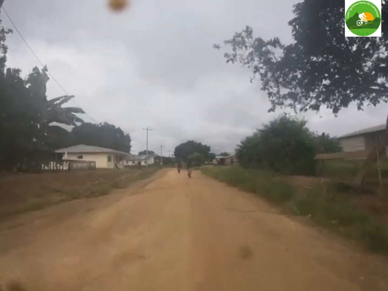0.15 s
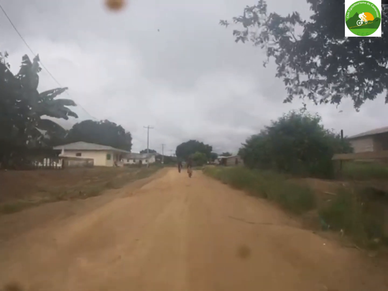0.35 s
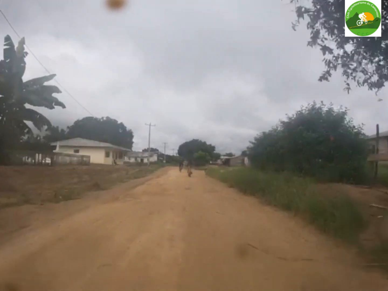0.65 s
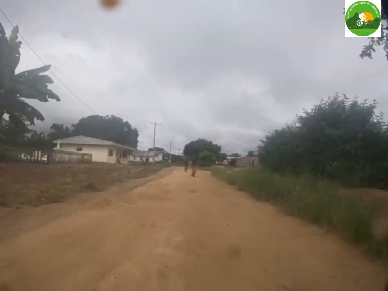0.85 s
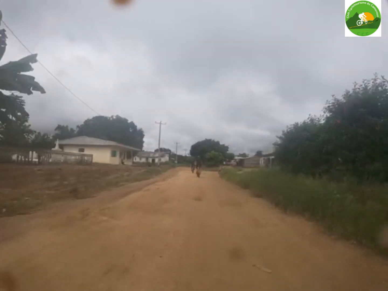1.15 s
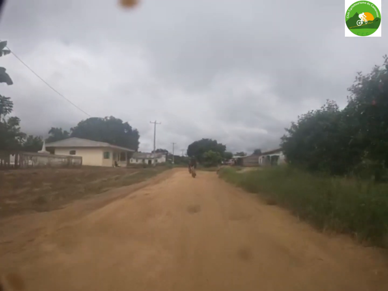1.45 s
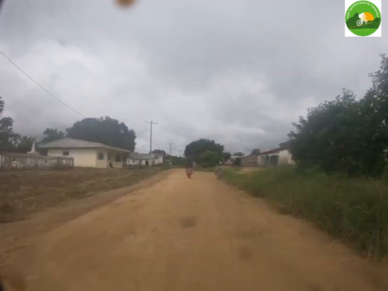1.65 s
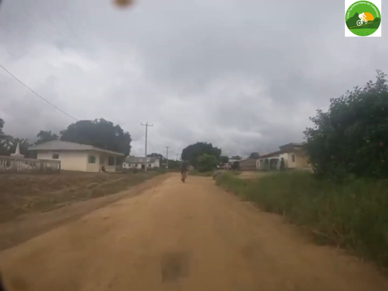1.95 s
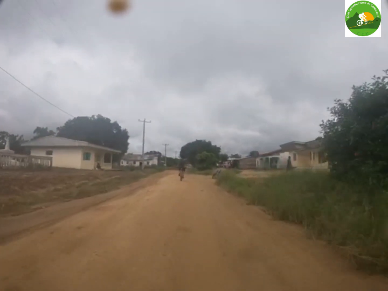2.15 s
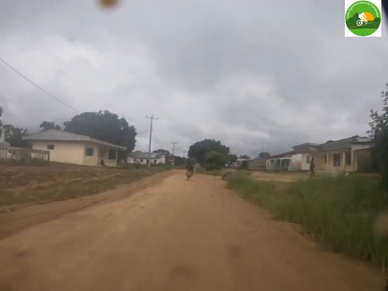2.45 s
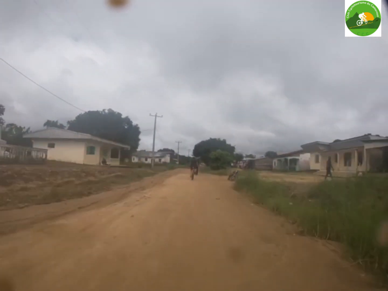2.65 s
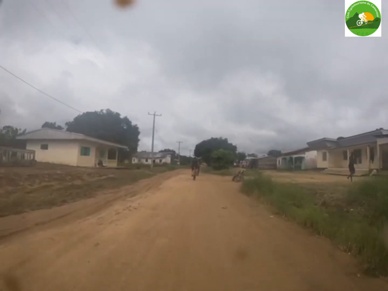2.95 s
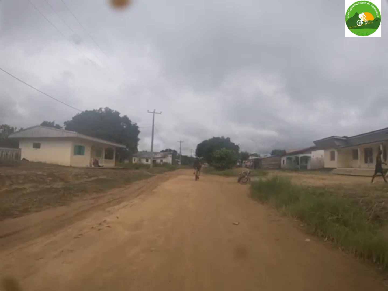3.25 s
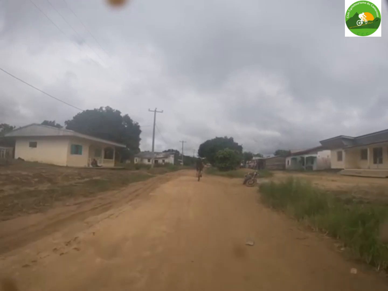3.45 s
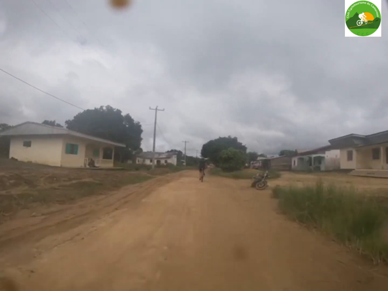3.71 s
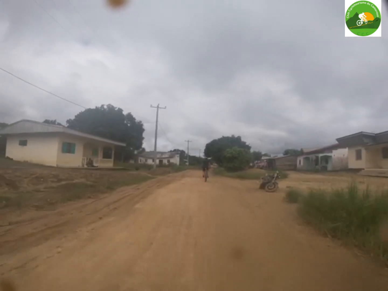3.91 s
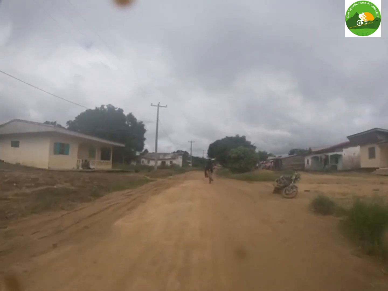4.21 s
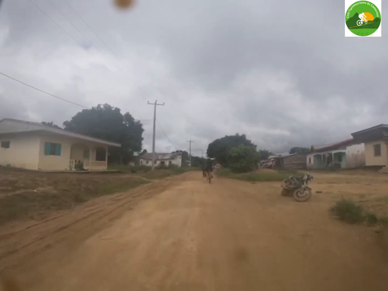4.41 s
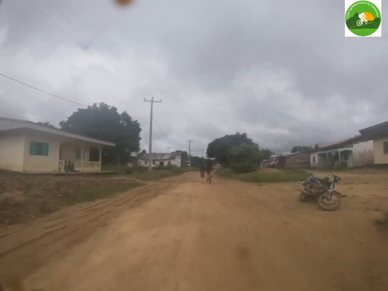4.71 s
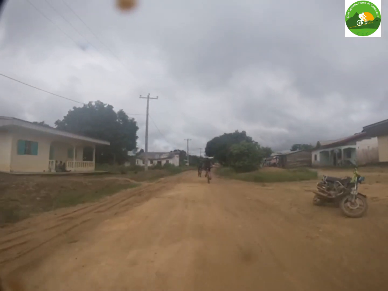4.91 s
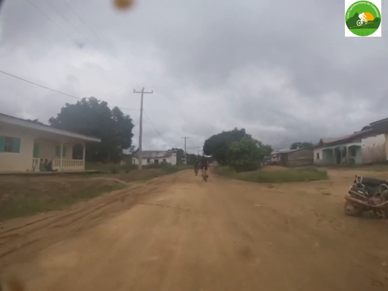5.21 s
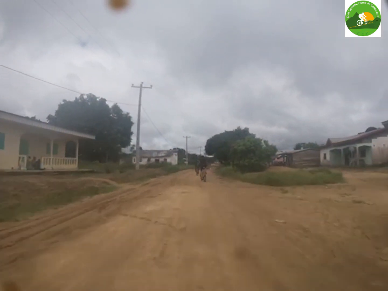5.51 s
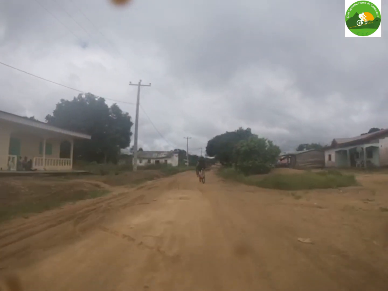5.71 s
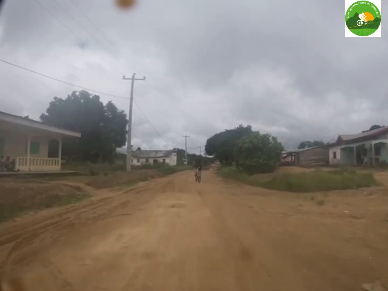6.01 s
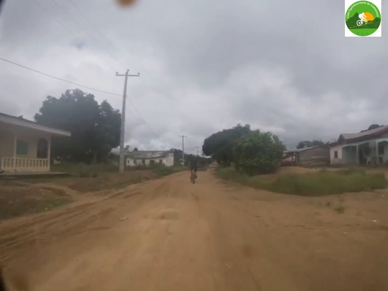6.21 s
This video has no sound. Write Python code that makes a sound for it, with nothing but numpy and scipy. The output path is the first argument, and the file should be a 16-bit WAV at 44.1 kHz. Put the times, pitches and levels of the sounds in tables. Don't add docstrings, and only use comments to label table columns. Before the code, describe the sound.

A bicycle rolls along a rough dirt road outdoors, heard from inside a sealed case on its handlebar. Rapid uneven knocks clack and thump for two seconds, the hardest with a tiny metallic chatter near 1.5 seconds. Then the knocks become isolated, boxier and shortly ringing, over faint muffled tyre hiss, low mount trembling and wind rumble. A last cluster comes near six seconds.

```python
import sys
import numpy as np
from scipy import signal
from scipy.fft import rfft, irfft
from scipy.io import wavfile
from scipy.ndimage import uniform_filter1d

SR = 44100
rng = np.random.default_rng(int(sys.argv[2]) if len(sys.argv) > 2 else 0)


def store_pcm(level_fs):
    pcm = np.round(np.clip(level_fs, -1, 1) * 32767).astype(np.int16)
    wavfile.write(sys.argv[1], SR, np.atleast_2d(pcm).T)


def field_ratio(decibels):
    return 10 ** (np.asarray(decibels, dtype=float) / 20)


N = 280639
MS = np.arange(-8192, 8192) / SR * 1000

# start_s, roughness_db, wind_db
RIDE = [(0.0, -63, -69), (0.44, -57, -70.5), (0.58, -67.5, -67.5), (0.83, -68.5, -72.5),
        (1.19, -63.5, -72.5), (1.57, -63, -72), (2.02, -67, -74), (2.27, -65.5, -75.5), (2.83, -56, -68.5),
        (2.97, -61.5, -71.5), (3.56, -60, -66.5), (4.16, -60.5, -71), (4.64, -57.5, -67.5),
        (4.96, -61.5, -66.5), (5.35, -58.5, -61.5), (5.61, -58, -61), (5.85, -58, -65.5),
        (6.36, -66.5, -69)]
# frequency_hz, density_db
TYRE_SPECTRUM = [(300, -30.5), (700, -5), (1100, 1), (1600, 2), (2300, -1), (3500, -4), (4300, -11),
                 (5000, -16.5), (6000, -23.5), (7000, -37), (9000, -56)]
TREMBLE_SPECTRUM = [(80, -49), (115, -24), (135, 1.5), (160, 2.5), (200, -1), (235, -2), (270, -46.5),
                    (400, -61.5)]
RUMBLE_SPECTRUM = [(8, 1.5), (20, 1.5), (50, 1.5), (90, -8), (120, -10), (200, -47), (400, -61.5)]
GUST_SPECTRUM = [(150, -23), (300, 2.5), (450, -4), (600, -3.5), (800, -9.5), (1300, -14.5), (2500, -38),
                 (5000, -62.5)]
SEAL_AIR_SPECTRUM = [(4500, -14), (6000, 5), (9000, 5), (11000, 2), (12500, -30.5)]
# frequency_hz, level_db
SHELL_SPECTRUM = [(150, 9.5), (600, 6), (1000, -0.5), (1600, 1), (2500, -6), (3200, -8), (4000, -15.5),
                  (5000, -25.5), (6300, -40), (8000, -63)]
# frequency_hz, width_hz, level_db
FRAME_MODES = [(1590, 22, -73), (1040, 84, -79)]
# start_s, tick_db, thump_db, swing_db
WASHBOARD = [(0.3432, -10, -21.5, -15), (0.4316, -13.5, -24.5, -23), (0.5598, -14, -22, -21.5),
             (0.785, -16.5, -24.5, -25), (0.992, -12, -21, -18.5), (1.0844, -17.5, -25, -25.5),
             (1.2163, -16, -22.5, -24), (1.34, -14.5, -25, -24.5), (1.4371, -15, -21.5, -22),
             (1.474, 3, -10.5, -9), (1.5437, -22, -26, -31), (1.6429, -17.5, -24.5, -24),
             (1.7113, -24, -28.5, -31), (1.827, -21.5, -26, -26.1), (1.963, -18.5, -23.5, -28),
             (1.9972, -27, -31.5, -31.5)]
# start_s, tick_db, thump_db, swing_db, ring_db
RUTS = [(2.3377, -16, -27.5, -19, -26), (2.666, -16.5, -27, -21, -28), (2.9593, -16, -25.7, -18, -21),
        (3.5234, -15, -22.5, -17, -25.5), (3.8216, -15.5, -21.5, -19, -24),
        (4.1515, -14.5, -23.5, -17, -22), (4.6293, -13, -24.5, -15.5, -35.5), (5.708, -13, -25.5, -15, -34),
        (5.7893, -16, -24.5, -18, -25.5), (6.0114, -14, -21.2, -16, -22), (6.051, -14.5, -23, -16.5, -27.5),
        (6.0993, -21, -29, -26, -44), (6.3105, -17, -22, -18, -24.5)]
# start_s, tick_db, direction_sign
REBOUNDS = [(0.375, -36, -1), (0.39, -36, -1), (1.4443, -29, -1), (1.4595, -35, -1), (1.477, -35.5, -1),
            (1.483, -36, -1), (1.5402, -30, -1), (1.5493, -35, -1), (1.5553, -38.5, -1), (1.668, -47, -1),
            (2.877, -37, -1), (2.88, -37.5, -1), (3.54, -22, -1), (4.6378, -23, -1),
            (.5991, -18, -1),
    (.5998, -18, 1),
    (.60008, -17, 1),
    (.60028, -18, -1),
]
# start_s, thump_db, direction_sign
SOFT_JOLTS = [(0.354, -31, 1), (0.3804, -43, 1), (0.603, -22, -1), (1.0945, -32, -1), (1.462, -21.5, -1),
              (1.4719, -25.5, -1), (2.0185, -37, -1), (2.885, -36, -1), (2.8902, -29, -1), (3.545, -44, 1),
              (3.5488, -26, -1), (3.8308, -26, -1), (4.158, -29, -1), (4.6415, -44, 1), (4.6625, -26, 1),
              (4.6645, -24, -1), (5.698, -31, -1), (5.7387, -24.5, -1), (5.8307, -33, -1),
              (6.1247, -28, -1), (6.3182, -26, -1), (6.3342, -29, -1)]
# start_s, level_db
TOUCHES = [
    (1.449, -61.5),
    (1.459, -52),
    (1.462, -50.5),
    (1.467, -49),
    (1.469, -50),
    (1.478, -55),
    (1.485, -51),
    (1.489, -54),
    (1.494, -56),
    (1.499, -61.5),
]
# pitch_hz, level_db, t60_ms
PART_MODES = [(1620, -7.5, 18), (4100, -3, 34), (4770, -11.5, 45), (5280, -14.5, 60)]
# start_s, level_db, pitch_hz, length_ms
SHIVERS = [
    (2.715, -44, 169, 8.4),
    (2.756, -44.5, 200, 9.7),
    (2.825, -41, 182, 7.9),
    (2.872, -38.5, 169, 7.7),
    (3.535, -33, 151, 3.1),
    (3.5398, -26, 189, 3),
    (4.617, -39.5, 166, 4.8),
    (4.647, -36.5, 172.8, 4.8),
    (5.722, -36, 205, 8),
    (5.805, -41, 194.4, 9),
]


def strikes(times, gains, shape):
    train = np.zeros(N)
    np.add.at(train, np.round(np.asarray(times) * SR).astype(int), gains)
    return signal.fftconvolve(train, shape)[len(shape) // 2:][:N]


def colour(table, size):
    hz, db = np.transpose(table)
    bins = np.maximum(np.fft.rfftfreq(size, 1 / SR), 1)
    return field_ratio(np.interp(np.log(bins), np.log(hz), db)) * (bins < hz[-1])


def noise(table):
    white = rfft(rng.standard_normal(N + 1))
    x = irfft(white * colour(table, N + 1), N + 1)[:N]
    return x / x.std()


def click(table):
    pulse = np.fft.fftshift(irfft(colour(table, len(MS))))
    return pulse / pulse.max()


def walk(rate_hz):
    k = int(SR / rate_hz)
    held = np.repeat(rng.standard_normal(N // k + 1), k)
    return 1.8 * uniform_filter1d(uniform_filter1d(held, k), k)[:N]


def ring(hz, t60_ms, late_ms=0):
    age = np.maximum(MS - late_ms, 0)
    return np.sin(2 * np.pi * hz * age / 1000) * np.exp(-np.log(1000) * age / t60_ms)


def loose(s):
    return .5 + .5 * np.tanh((s - 3.05) / .25)


def jolts():
    usual_swing_db, usual_ring_db, ring_per_swing = -18.5, -29, 1.48
    quick = [(*row, usual_ring_db + ring_per_swing * (row[-1] - usual_swing_db)) for row in WASHBOARD]
    return np.transpose(quick + RUTS)


def tyres(db):
    out = noise(TYRE_SPECTRUM) * field_ratio(db + 0.6 * walk(25))
    for hz, width_hz, peak_db in FRAME_MODES:
        resonator = signal.iirpeak(hz, hz / width_hz, SR)
        mode = signal.lfilter(*resonator, rng.standard_normal(N))
        out = out + mode * field_ratio(peak_db + 19 + 1.7 * walk(4.6))
    return out


def grit(db, count=400):
    when, size = rng.random((count, 2)).T
    at = when * (N - 1) / SR
    grain_db = db[(at * SR).astype(int)] + 7 + 6 * size
    return strikes(at, field_ratio(grain_db), click(TYRE_SPECTRUM))


def mount(db):
    s, _, _, swing_db, _ = jolts()
    swell = np.exp(-np.abs(MS - 8) / np.where(MS > 8, 14, 9))
    aftermath = strikes(s, field_ratio(swing_db - 27), swell)
    return noise(TREMBLE_SPECTRUM) * (field_ratio(db + 1.6 * walk(22)) + aftermath)


def wind(rumble_db, gust_db, seal_db):
    rumble = noise(RUMBLE_SPECTRUM) * (field_ratio(rumble_db + 1.1 * walk(8)) + sway())
    gust = noise(GUST_SPECTRUM) * field_ratio(gust_db + 1.3 * walk(30))
    seal_air = noise(SEAL_AIR_SPECTRUM) * field_ratio(seal_db - 2.5 + 0.95 * walk(16))
    return rumble + gust + seal_air


def contacts(seal_db):
    s, tick_db, _, swing_db, ring_db = jolts()
    extra_ring_db = np.clip(ring_db - swing_db + 9.5, -8, 8)
    wall_db = np.interp(loose(s), (0, 1), (-1.44, 4)) - .3 * loose(s) * extra_ring_db
    sharpness_db = .25 * np.maximum(tick_db + 11, 0)
    edge_db = seal_db + np.interp(np.arange(N) / SR, s, sharpness_db)

    tick = click(SHELL_SPECTRUM) * field_ratio(-2.0)
    wall_band = signal.butter(1, (300, 900), "band", fs=SR, output="sos")
    wall = signal.sosfiltfilt(wall_band, tick)
    small_s, small_db, way = np.transpose(REBOUNDS)
    train = strikes(small_s, np.sign(way) * field_ratio(small_db), [1]) - strikes(s, field_ratio(tick_db), [1])
    ticks = signal.fftconvolve(train, tick, "same")
    edges = signal.fftconvolve(train * field_ratio(edge_db + 51), click(SEAL_AIR_SPECTRUM), "same")
    slaps = strikes(s, field_ratio(tick_db) * (field_ratio(wall_db) - 1), wall)
    return ticks + edges - slaps


def thump(late_ms):
    squeeze = np.exp(-.5 * ((MS - late_ms) / 1.6) ** 2)
    return signal.lfilter(*signal.butter(2, 11.0, "high", fs=SR), squeeze)


def knocks(seal_db):
    s, _, thump_db, swing_db, ring_db = jolts()
    swing = np.exp(-.5 * ((MS - 1.9) / 2.48) ** 2) * np.cos(2 * np.pi * 0.19 * (MS - 2.9))
    return (contacts(seal_db)
            - strikes(s, field_ratio(thump_db), thump(4.33))
            - strikes(s, field_ratio(swing_db), swing)
            + strikes(s, field_ratio(ring_db), ring(182.6, 34, late_ms=4.904)))


def sway():
    s, _, thump_db, _, _ = jolts()
    return strikes(s, field_ratio(thump_db - 32), (MS > 0) * np.exp(-np.abs(MS) / 53))


def soft_jolts():
    s, db, way = np.transpose(SOFT_JOLTS)
    return strikes(s, np.sign(way) * field_ratio(db), thump(0))


def rattle():
    onset = 1 - np.exp(-np.maximum(MS, 0) / 1.8)
    out = np.zeros(N)
    for s, touch_db in TOUCHES:
        for hz, mode_db, t60_ms in PART_MODES:
            size, tune = rng.standard_normal(2)
            mode = onset * ring(hz * (1 + 0.015 * tune), t60_ms)
            out += strikes([s], field_ratio(touch_db + mode_db + 5.5 + 3.6 * size), mode)
    return out


def shivers():
    out = np.zeros(N)
    for s, db, hz, length_ms in SHIVERS:
        shape = np.exp(-.5 * (MS / length_ms) ** 2) * np.cos(2 * np.pi * hz * MS / 1000)
        out += strikes([s], field_ratio(db), shape)
    return out


def scene():
    t = np.arange(N) / SR
    s, rough_db, wind_db = np.transpose(RIDE)
    rough_db, wind_db = np.interp(t, s, rough_db), np.interp(t, s, wind_db)
    dip_db = -6 * (t > 1.5) * np.exp(-((t - 1.5) / 0.65) ** 2)
    tyre_db = -68 + .15 * (rough_db + 60) + dip_db
    rumble_db = -56.5 + 0.25 * (wind_db + 68)
    seal_db = np.interp(loose(t), (0, 1), (-98.5, -90.5)) + .4 * dip_db
    road = tyres(tyre_db) + grit(tyre_db) + mount(rough_db + 0.83)
    air = wind(rumble_db, wind_db + 1.3, seal_db)
    hits = knocks(seal_db) + soft_jolts() + rattle() + shivers()
    return (road + air + hits)[None]


def band_limit(x):
    return signal.sosfilt(signal.butter(12, 11900, fs=SR, output="sos"), x)


def record(dry):
    mix = np.tanh(dry)
    return band_limit(mix)


dry = scene()
out = record(dry)
store_pcm(out)
```